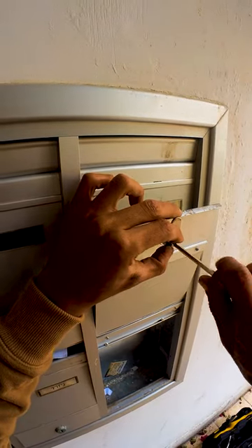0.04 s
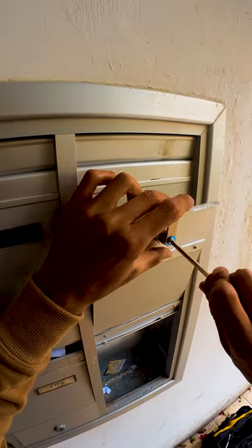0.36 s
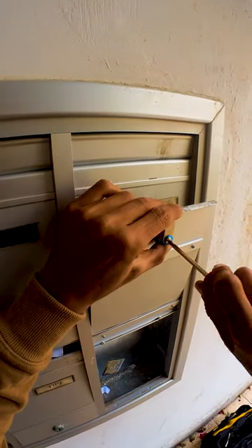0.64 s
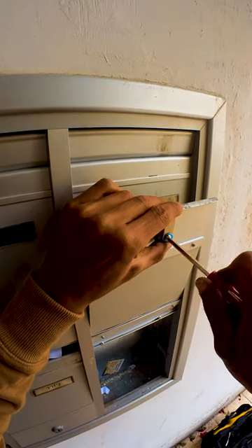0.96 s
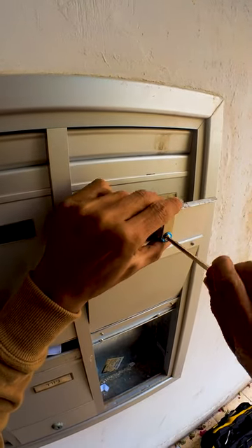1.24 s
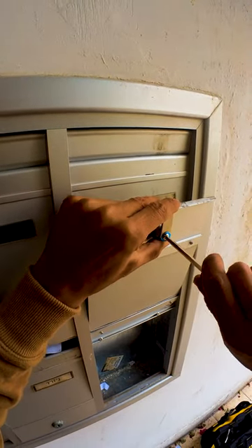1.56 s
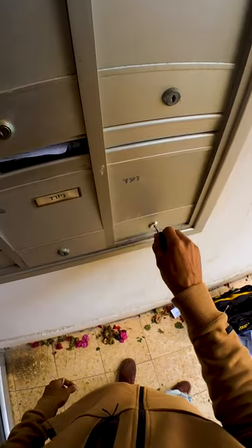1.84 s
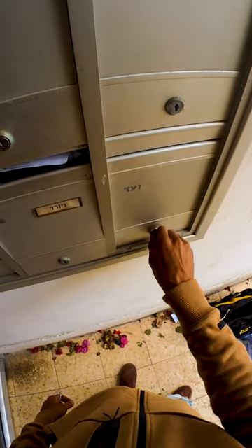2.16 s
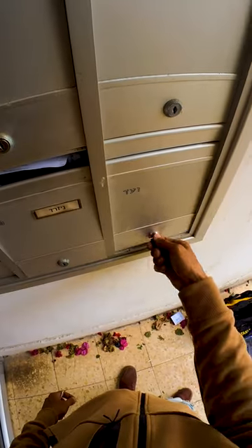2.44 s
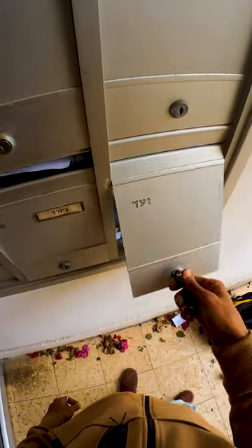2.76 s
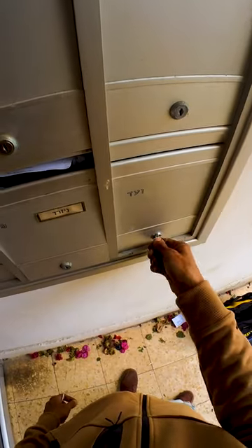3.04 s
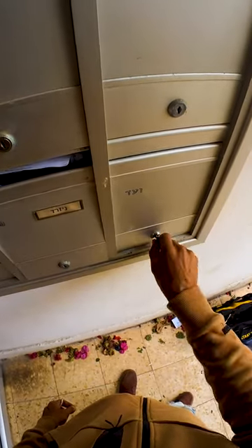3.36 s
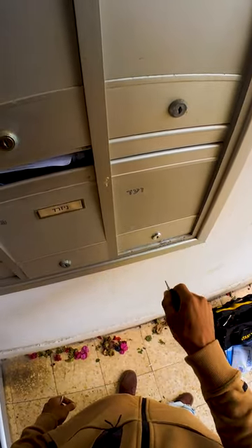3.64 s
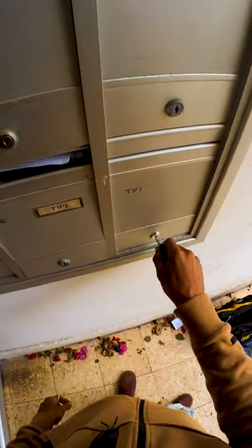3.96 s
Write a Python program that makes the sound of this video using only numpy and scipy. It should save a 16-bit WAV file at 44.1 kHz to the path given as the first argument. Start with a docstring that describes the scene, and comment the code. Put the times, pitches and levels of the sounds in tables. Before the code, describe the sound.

A metal mailbox is unlocked and shut at arm's length outdoors. After light screwdriver taps and sleeve rustle, a key clicks in and turns, the thin door scrapes open and claps shut, and the key comes out.

```python
"""Opening a metal mailbox.

A bank of thin metal mailboxes in an outdoor entrance, at arm's length. A screwdriver ticks on a loose
lock while sleeves rustle and a far bird calls. Then a key goes in and turns, the door scrapes open and
claps shut, the lock turns back and the key is pulled out. Each knock sets panel, door and lock
ringing; each scrape is a run of tiny knocks."""
import sys
import numpy as np
from scipy import signal
from scipy.fft import rfft, irfft
from scipy.io import wavfile
from scipy.ndimage import uniform_filter1d

SR = 44100
rng = np.random.default_rng(int(sys.argv[2]) if len(sys.argv) > 2 else 0)


def to_wav(sig):
    """Store sig (one row per channel, or 1-D mono) as 16-bit WAV at the path in sys.argv[1].

    Samples outside -1..1 are clipped; the rate is SR.
    """
    pcm = np.clip(np.atleast_2d(sig), -1, 1) * 32767
    pcm = np.round(pcm).astype(np.int16)
    wavfile.write(sys.argv[1], SR, pcm.T)  # frames by channels


N = 176400
RING_S = .6  # room for the tail of one hit


def undb(db):
    """Decibels to amplitude."""
    return 10 ** (np.asarray(db) / 20)


def unit(x):
    """Scale to rms 1."""
    return x / np.sqrt(np.mean(x ** 2) + 1e-20)


def fade(t, t60):
    """Exponential decay, 60 dB down after t60 seconds."""
    return np.exp(-np.log(1000) * t / max(t60, 1e-3))


def ring(t, hz, t60):
    """One fading mode."""
    return fade(t, t60) * np.sin(2 * np.pi * hz * t)


def add(out, at_s, x):
    """Mix x in at a time."""
    i = max(int(at_s * SR), 0)
    out[i:i + len(x)] += x[:N - i]


def butter(x, order, hz, kind="low"):
    """Butterworth filter, low-pass by default."""
    return signal.sosfilt(signal.butter(order, hz, kind, fs=SR, output="sos"), x)


def noise(points, size, lo=0, hi=SR):
    """Noise of rms 1, shaped by (frequency [Hz], level [dB]) points between two band edges."""
    f = np.fft.rfftfreq(size, 1 / SR) + 0.0011
    hz, db = np.array(points).T
    gain = undb(np.interp(np.log(f), np.log(hz), db))
    gain /= np.sqrt((1 + (lo / f) ** 12) * (1 + (f / hi) ** 12))
    return unit(irfft(rfft(rng.standard_normal(size)) * gain, size))


# Tone of the outdoor bed: (frequency [Hz], level [dB])
AIR_SPECTRUM = [(15, -61.5), (25, -21), (61, 7), (190, 3), (545, -8.5), (911, -8), (1400, -14), (1790, -13),
                (2000, -16), (2840, -15), (3250, -17.5), (3620, -18.5), (16000, -42)]
def outdoor_air(level_db=-67):
    """A quiet, steady bed of air, weighted to the lows."""
    return undb(level_db) * noise(AIR_SPECTRUM, N)


# Bird phrase: (time [s], length [s], start pitch [Hz], end pitch [Hz], level [dB])
BIRD_CALLS = [(0.834, 0.15, 3020, 3250, -68.5), (.97, .06, 3210, 3200, -80),
              (1.087, 0.23, 2740, 2700, -60.5), (1.672, 0.081, 3780, 4020, -75.5),
              (1.799, 0.18, 3550, 3500, -82.5)]
def far_bird(width_hz=210):
    """Thin gliding whistles, blurred by distance into narrow bands of noise."""
    out = np.zeros(N)
    blur = unit(butter(rng.standard_normal((2, N)), 2, width_hz / 2))
    for at, length, start_hz, end_hz, db in BIRD_CALLS:
        n, i = int(length * SR), int(at * SR)
        phase = 2 * np.pi * np.cumsum(np.linspace(start_hz, end_hz, n)) / SR
        tone = blur[0, i:i + n] * np.cos(phase) + blur[1, i:i + n] * np.sin(phase)
        add(out, at, undb(db) * np.sin(np.linspace(0, np.pi, n)) * tone)
    return out


# Fader moves for the cloth: (time [s], rumble [dB], rub [dB])
RUSTLE_LEVELS = [(0, -56.5, -62.5), (.1, -60, -66), (.16, -57, -64), (.27, -55.5, -70), (.33, -75, -67),
                 (.39, -61, -64.5), (.62, -58, -66.5), (.77, -59, -68.5), (.84, -55.5, -71),
                 (.99, -55, -69), (1.09, -63, -69.5), (1.2, -53.5, -61), (1.33, -58, -61),
                 (1.5, -54, -69.5), (1.66, -51, -70), (1.72, -63, -75), (1.78, -76, -94)]
# Tone of the low rumble and of the midrange rub: (frequency [Hz], level [dB])
RUMBLE_SPECTRUM = [(20, -16), (40, -14), (75, -4.5), (160, -1), (230, -5.5), (350, -19), (600, -26),
                   (1500, -79)]
RUB_SPECTRUM = [(200, -25.5), (500, -3), (1000, 10.5), (1500, -5.5), (2500, -18), (5000, -26), (10000, -53)]
def sleeves():
    """Cloth and hands rumble and rub in fits, close up, while the screwdriver works."""
    at, rumble_db, rub_db = np.array(RUSTLE_LEVELS).T

    def layer(spectrum, db, grain_db):
        flutter = unit(uniform_filter1d(rng.standard_normal(N), size=700))
        grain = unit(undb(grain_db * flutter))
        level = undb(np.interp(np.arange(N) / SR, at, db, right=-120))
        return grain * level * noise(spectrum, N)

    return layer(RUMBLE_SPECTRUM, rumble_db, grain_db=2) + layer(RUB_SPECTRUM, rub_db, grain_db=3)


# Body of a tap: (frequency [Hz], level [dB], t60 [s])
TAP_MODES = [(820, -40, 0.058), (1160, -5, 0.032), (1290, -16, 0.022), (2030, -2, 0.015), (2800, 2.5, 0.02),
             (3130, -17, 0.036), (4580, -2.5, .014), (4930, -14, 0.025), (6300, -20, 0.034)]
# Screwdriver cues: (time [s], level [dB], ping pitch [Hz])
SCREWDRIVER_TAPS = [(.063, -60, 4430), (.1397, -50, 1160), (.1413, -38.5, 1980), (0.665, -78, 900),
                    (0.697, -75, 1050), (1.10, -66, 4760), (1.18, -65, 1820), (1.245, -61, 1140),
                    (1.275, -72, 825), (1.32, -64.5, 4900), (1.475, -72, 4930)]
def screwdriver(ping_db=3, echo_db=-9, top_hz=5750):
    """Blunt taps on a lock damped by the hand, with a faint echo from the entrance."""
    out, t = np.zeros(N), np.arange(int(RING_S * SR)) / SR
    body = sum(undb(db) * ring(t, hz, t60) for hz, db, t60 in TAP_MODES)
    for at, db, ping_hz in SCREWDRIVER_TAPS:
        tap = body + undb(ping_db) * ring(t, ping_hz, t60=0.024)
        attack = tap * fade(t, t60=.008)
        echo = unit(signal.fftconvolve(rng.standard_normal(len(t)), attack)[:len(t)])
        add(out, at, undb(db) * (tap + undb(echo_db) * echo * fade(t, t60=0.13)))
    return butter(out, 4, top_hz)


def steady(x, lo):
    """Even out chance swells longer than a few cycles, so that a blow has a definite strength."""
    size = int(SR * max(3 / lo, .004))
    return x / np.sqrt(uniform_filter1d(x ** 2, size) + 1e-9)


# Tone of the sheet metal: (frequency [Hz], level [dB])
PANEL_SPECTRUM = [(90, -7), (140, -3), (200, -2.5), (255, 1), (310, 2.5), (365, -7), (420, 1), (490, -3),
                  (650, -5), (850, -1), (1250, -2.5), (1650, -6.5), (2100, 0), (2800, 6), (3600, -0.5),
                  (4900, 3.5), (6000, -5), (8800, -8.5), (11600, -16.5), (12600, -27), (15800, -24.5)]
# Bounds of the thump, clack, clink and tick bands: (frequency [Hz])
CROSSOVERS_HZ = [95, 700, 2000, 6000, 16000]
# Tail of each band: (t60 [s])
BAND_TAILS_S = [0.3, 0.2, 0.16, 0.12]
def panel_crack(t, band_db, ring_db, crack_s=0.0038, tail_trim_db=-1, ripple_db=2.5):
    """The panel's many close modes crack and wash out; each struck spot favours different ones."""
    hz = np.geomspace(CROSSOVERS_HZ[0], CROSSOVERS_HZ[-1], 110)
    panel_hz, panel_db = np.array(PANEL_SPECTRUM).T
    spot_db = np.interp(np.log(hz), np.log(panel_hz), panel_db) + ripple_db * rng.standard_normal(len(hz))
    colour = np.column_stack([hz, spot_db])
    out = np.zeros(len(t))
    for db, lo, hi, t60 in zip(band_db, CROSSOVERS_HZ, CROSSOVERS_HZ[1:], BAND_TAILS_S):
        attack = 1 - np.exp(-t * lo * 4)
        crack = np.exp(-t / (crack_s + 0.37 / lo))
        tail = undb(ring_db + tail_trim_db) * fade(t, t60)
        out += undb(db) * attack * (crack + tail) * steady(noise(colour, len(t), lo, hi), lo)
    return out


# Hollow ring of door and box: (frequency [Hz], level [dB], t60 [s])
DOOR_RING = [(145, -8, .42), (223, -9, .42), (296, -10, .36), (322, -6, .3), (404, -9, .3), (457, -9, .32),
             (678, -13, .24), (829, -8, .23), (904, -9, .26), (1028, -12, .22), (1184, -9, .26),
             (1353, -14, .26), (1468, -11, .24)]
# Bright ring of key and lock barrel: (frequency [Hz], level [dB], t60 [s])
LOCK_RING = [(1910, -11, .16), (2410, -15, .15), (2490, -15, .16), (2622, -12, .16), (3080, -16, .15),
             (3522, -17, .15), (3713, -16, .15), (4541, -13, .15), (4905, -12, .16), (5106, -13, .16),
             (5362, -15, .15), (7050, -16, .12), (7800, -17, .13), (8560, -18, .17)]
def door_and_lock(t, band_db, ring_db, trim_db=-2.5, scatter_db=0.8):
    """Door and lock ring on, each mode driven by the blow's strength in its band."""
    out = np.zeros(len(t))
    for hz, db, t60 in DOOR_RING + LOCK_RING:
        size, detune, side = rng.standard_normal(3)
        band = np.searchsorted(CROSSOVERS_HZ, hz) - 1
        drive_db = band_db[band] + ring_db + trim_db + scatter_db * size
        out += np.sign(side) * undb(drive_db + db) * ring(t, hz * (1 + 0.0033 * detune), t60)
    return out


# Light contacts last longer and sound duller: (tick level [dB], cutoff [Hz], attack [s])
CONTACT_HARDNESS = [(-75.5, 7700, 0.0034), (-54, 8900, .0018), (-45, 14000, 0.00044)]
def strike(band_db, ring_db, boom_hz, ping_hz, ping_db, boom_lift_db=4, ping_split=0.0114):
    """One contact: the pushed panel booms and cracks, the touched part pings, door and lock ring on."""
    t = np.arange(int(RING_S * SR)) / SR
    thump_db, _, _, tick_db = band_db
    boom = undb(thump_db + boom_lift_db) * (1 - np.exp(-t * boom_hz)) * ring(t, boom_hz, t60=0.093)
    beating_pair = sum(ring(t, ping_hz * (1 + ping_split * k), t60=0.07) for k in (-1, 1))
    ping = undb(ping_db) * beating_pair / 2 ** .5
    hit = boom + ping + panel_crack(t, band_db, ring_db) + door_and_lock(t, band_db, ring_db)
    ticks_db, cutoffs_hz, attacks_s = np.array(CONTACT_HARDNESS).T
    attack = 1 - np.exp(-t / np.interp(tick_db, ticks_db, attacks_s))
    return butter(attack * hit, 4, np.interp(tick_db, ticks_db, cutoffs_hz))


# Slides of key and door: (time [s], length [s], thump [dB], clack [dB], clink [dB], tick [dB],
# swell from start to end [dB], boom pitch [Hz], ping pitch [Hz], ping level [dB])
SCRAPE_CUES = [ (1.99, 0.098, -53.5, -63, -76, -73, 11.5, 481, 2844, -59),
               (2.139, 0.045, -47.5, -48, -46, -48.5, 1.5, 507, 4200, -59),
               (2.528, 0.037, -52.5, -53.5, -49.5, -47, 9, 280, 2540, -41.5),
               (2.571, 0.046, -46.5, -50.5, -50, -54, -13, 246, 4900, -64),
               (2.63, .15, -56.5, -78, -89, -95.5, -7.5, 212, 1170, -55.5),
               (2.987, .072, -41.5, -53.5, -53.5, -53.5, 14, 326, 4690, -61.5),
               (3.075, 0.061, -40, -37, -34, -39, -4, 146.8, 5320, -43.5),
               (3.53, .045, -47.5, -47.5, -46, -47, -15.5, 400, 2820, -65)]
def scrapes(slips_per_s=650, scatter_db=2, ring_db=-7):
    """Sliding metal sticks and slips; each slip is a tiny blow on the same parts."""
    out = np.zeros(N)
    for at, length, *band_db, swell_db, boom_hz, ping_hz, ping_db in SCRAPE_CUES:
        n = int(length * SR)
        chance, size = rng.random(SR)[:n], rng.standard_normal(SR)[:n]
        slip_db = scatter_db * abs(size) + swell_db * np.arange(n) / n
        slips = (chance < slips_per_s / SR) * np.sign(size) * undb(slip_db)
        slips = unit(slips) * np.sqrt(160 / SR)  # the energy of 160 full blows a second
        add(out, at, signal.fftconvolve(slips, strike(band_db, ring_db, boom_hz, ping_hz, ping_db)))
    return out


# Hits of key, lock and door: (time [s], thump [dB], clack [dB], clink [dB], tick [dB],
# ring against the crack [dB], boom pitch [Hz], ping pitch [Hz], ping level [dB])
# The key finds the slot at 1.97 s, runs over the pins at 2.10 and turns at 2.35. The door comes free
# at 2.49 and claps shut at 3.06. The lock turns back at 3.33 and the key comes out at 3.47.
KNOCK_CUES = [ (1.971, -53, -55.5, -52, -53.5, -7.5, 238, 2790, -55),
              (2.033, -49.5, -58.5, -58.5, -85, 1, 398, 2800, -66),
              (2.062, -62.5, -53.5, -50.5, -63, -4, 495, 3000, -50),
              (2.1043, -39, -40.5, -33, -34.5, -6, 283, 1275, -32),
              (2.1145, -42, -36.5, -38.5, -40, -0.5, 502, 4250, -35.5),
              (2.127, -41, -41.5, -52, -44, -3, 238, 3130, -40.5),
              (2.136, -36, -45, -45, -47, 1, 593, 7050, -42),
              (2.1903, -32, -40.5, -31.5, -34.5, -7.5, 450, 6170, -36),
              (2.2, -38.5, -35, -27.5, -30.5, -10.5, 298, 4160, -31),
              (2.2669, -48, -54, -47.5, -52.5, -13, 242, 3030, -45.5),
              (2.3142, -61, -62, -74, -89, 4.5, 216, 2535, -48),
              (2.3536, -54.5, -43, -37, -53, -19, 674, 2510, -37.5),
              (2.37, -46.5, -49.5, -47.5, -59.5, -2, 227, 1455, -42),
              (2.3984, -39.5, -43.5, -41.5, -39, -8.5, 194, 8525, -43),
              (2.416, -42, -37.5, -44.5, -47, -12.5, 309, 2510, -42),
              (2.488, -54, -60, -49, -45, -14, 238, 1087, -50),
              (2.492, -40.5, -45.5, -46.5, -52.5, -1.5, 235, 4075, -46),
              (2.586, -38, -43.5, -46, -48.5, -7, 467, 2640, -42.5),
              (2.607, -35, -46, -53, -54, -7.5, 603, 6620, -44.5),
              (2.736, -49, -48, -57, -92, -8.5, 135, 3133, -48),
              (2.798, -61, -71.5, -72, -62, -10.5, 187, 2620, -56),
              (2.9305, -60, -56.5, -66, -94, 2.5, 680, 1604, -50.5),
              (3.023, -56, -50.5, -50, -75, 0.5, 322, 1195, -48),
              (3.0572, -29.5, -34.5, -33.5, -32.5, -0.5, 309, 4890, -29),
              (3.067, -24.5, -33.5, -23, -29.5, -12, 320, 2410, -39.5),
              (3.098, -29, -41, -36, -31.5, -12.5, 451, 4540, -39),
              (3.12, -40, -36.5, -32, -39, -3, 416, 4920, -35),
              (3.1251, -45, -37.5, -32.5, -36, -1.5, 373, 2960, -48),
              (3.145, -36.5, -55, -39.5, -48.5, 0.5, 223, 2490, -54.5),
              (3.1989, -42, -45.5, -43, -51, -2.5, 215, 3063, -37),
              (3.2317, -47, -48.5, -45, -58.5, -11, 269, 5087, -58.5),
              (3.2817, -56.5, -60.5, -64.5, -85, 7, 240, 5100, -75),
              (3.3271, -47, -45.5, -45.5, -39.5, -4, 486, 2594, -37.5),
              (3.33, -44.5, -39.5, -39.5, -51, -4, 237, 1065, -41),
              (3.367, -41, -46, -49, -49, -27, 234.5, 8550, -66),
              (3.473, -54.5, -65, -61.5, -55, 4, 312, 5437, -66),
              (3.501, -37.5, -45, -36.5, -41.5, -5, 268, 2625, -40),
              (3.507, -31, -41, -26.5, -31, -11.5, 447, 5110, -31.5),
              (3.515, -31, -46, -36.5, -35, -8.5, 258, 1520, -38.5),
              (3.522, -35, -44, -39, -46, -9, 141, 1920, -39.5),
              (3.528, -43, -42, -45, -36.5, -9.5, 281, 3000, -36),
              (3.564, -48.5, -48, -36.5, -51.5, -28, 183, 3100, -40.5),
              (3.939, -61.5, -78.5, -88.5, -100, -9.5, 84, 2600, -90.5)]
def knocks():
    """Key, pins, latch and door hit one another."""
    out = np.zeros(N)
    for at, *band_db, ring_db, boom_hz, ping_hz, ping_db in KNOCK_CUES:
        add(out, at, strike(band_db, ring_db, boom_hz, ping_hz, ping_db))
    return out


def scene():
    """Mono mix: the mailbox, too small to radiate deep bass, in front of the quieter layers."""
    mailbox = butter(knocks() + scrapes(), 2, hz=85, kind="high")
    return (mailbox + screwdriver() + far_bird() + sleeves() + outdoor_air())[None]


def record(dry):
    """A steep low-pass takes off the very top."""
    top_hz = 15850
    return signal.sosfilt(signal.ellip(10, .2, 70, top_hz, fs=SR, output="sos"), dry)


dry = scene()
out = record(dry)
to_wav(out)
```